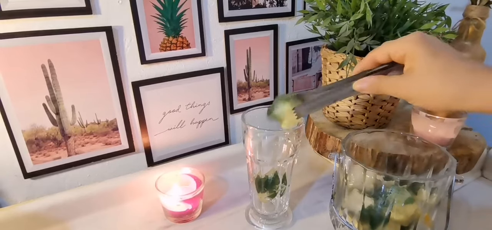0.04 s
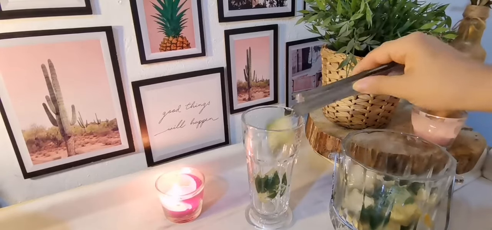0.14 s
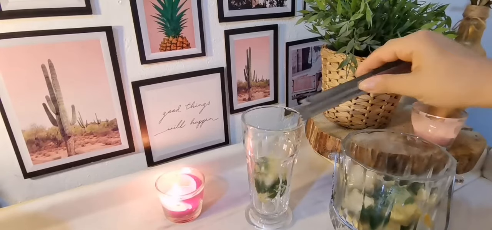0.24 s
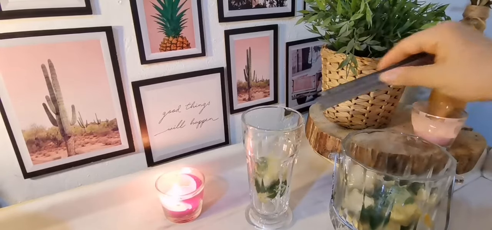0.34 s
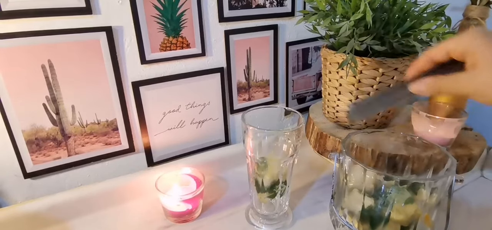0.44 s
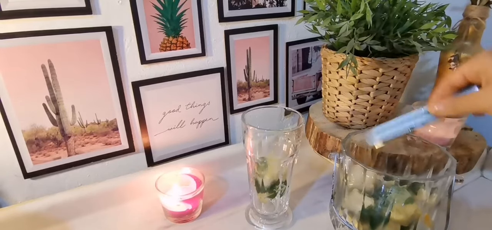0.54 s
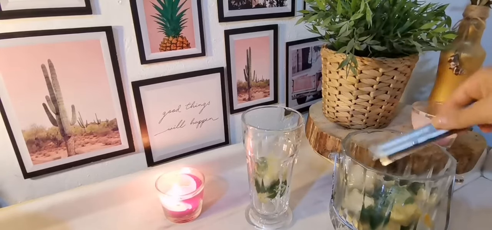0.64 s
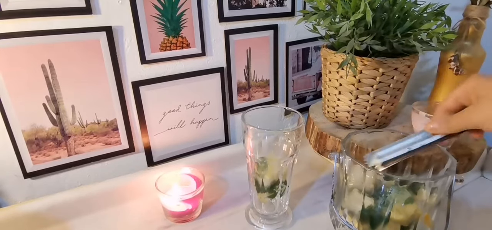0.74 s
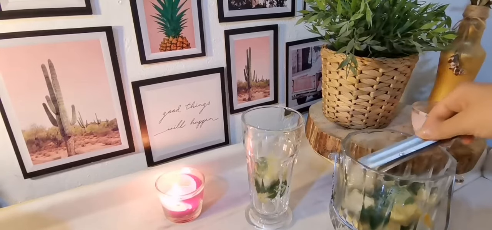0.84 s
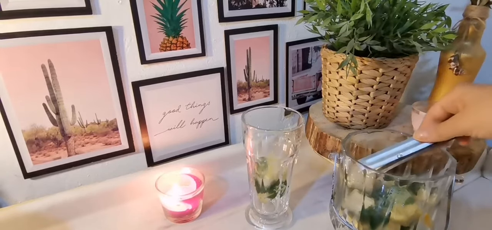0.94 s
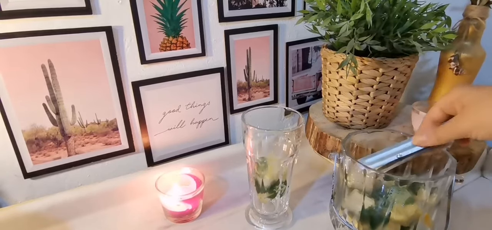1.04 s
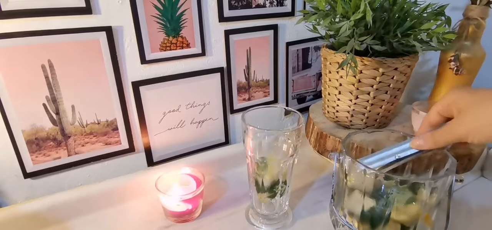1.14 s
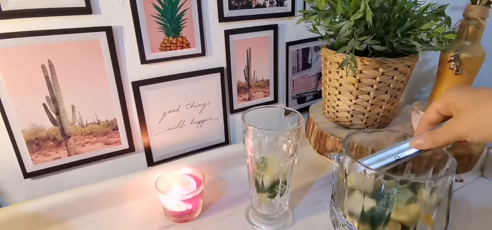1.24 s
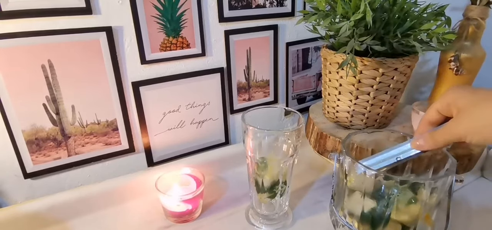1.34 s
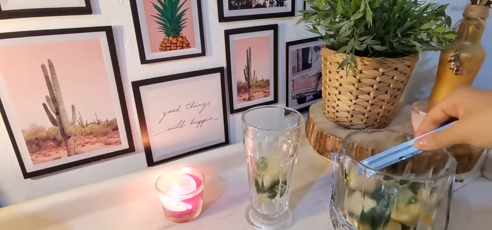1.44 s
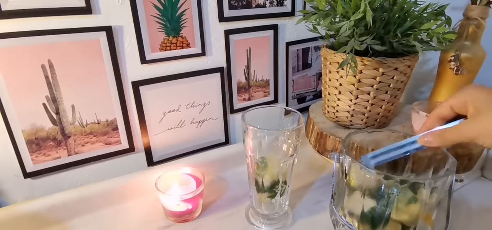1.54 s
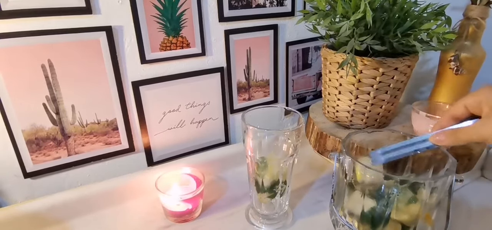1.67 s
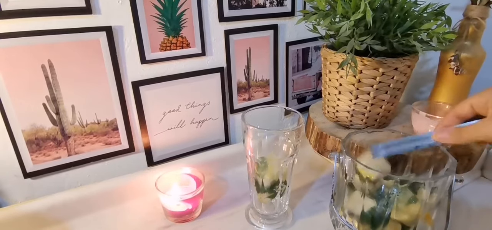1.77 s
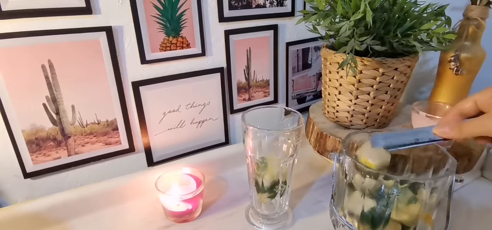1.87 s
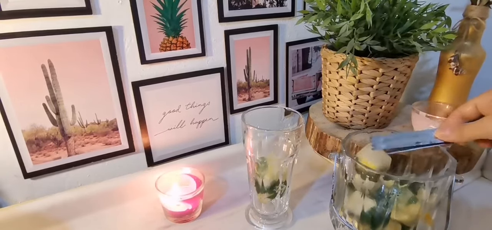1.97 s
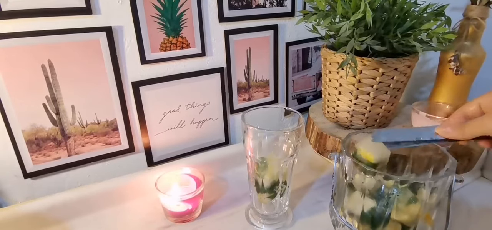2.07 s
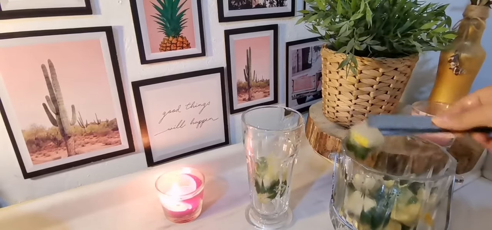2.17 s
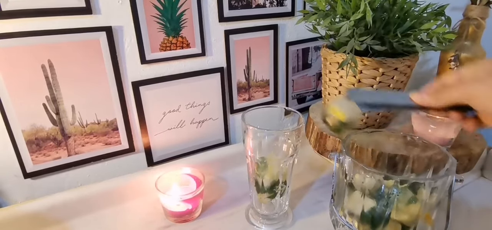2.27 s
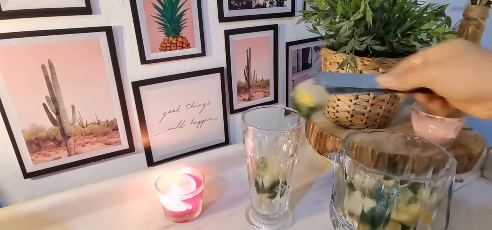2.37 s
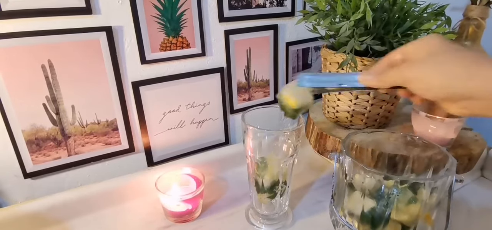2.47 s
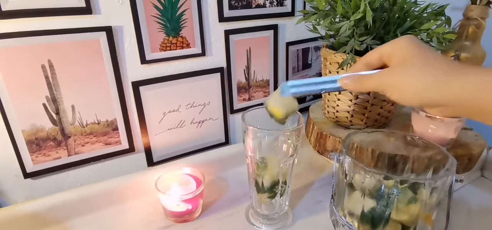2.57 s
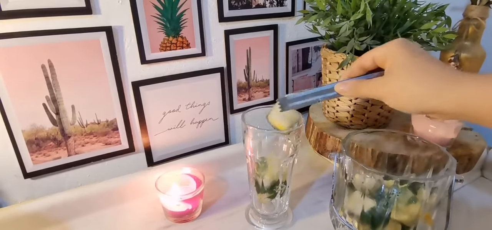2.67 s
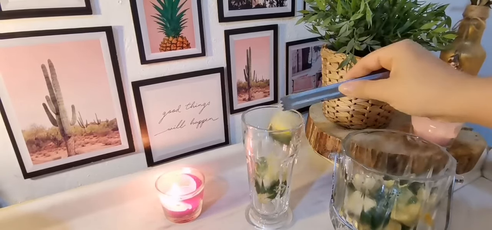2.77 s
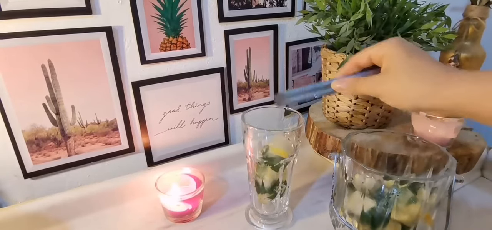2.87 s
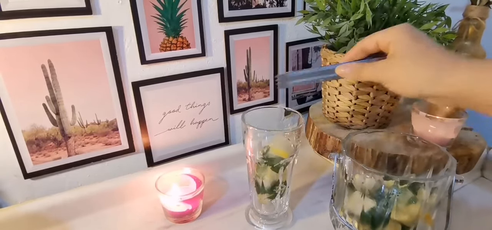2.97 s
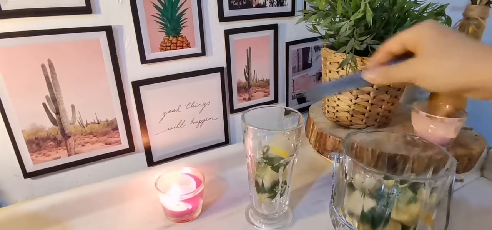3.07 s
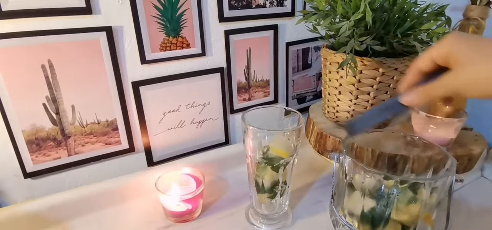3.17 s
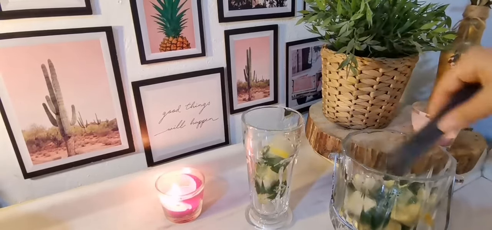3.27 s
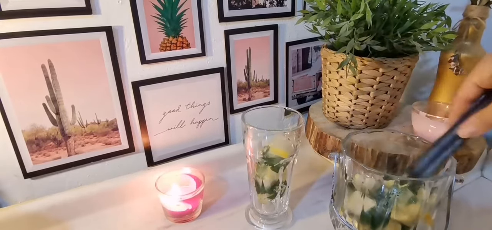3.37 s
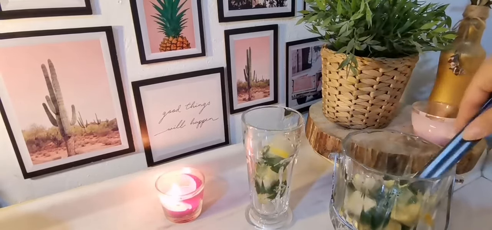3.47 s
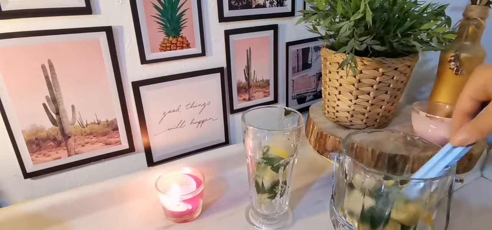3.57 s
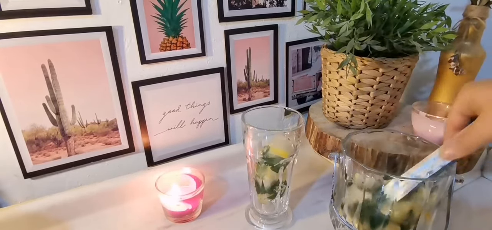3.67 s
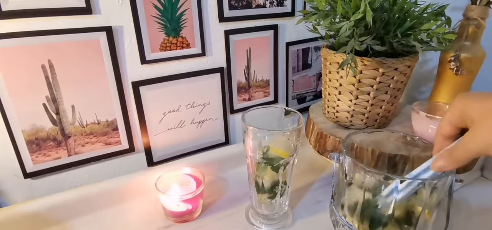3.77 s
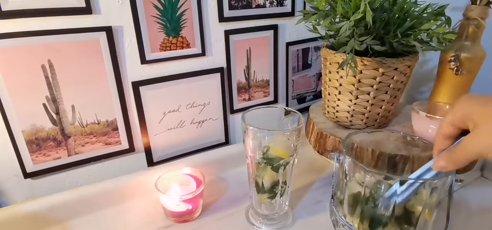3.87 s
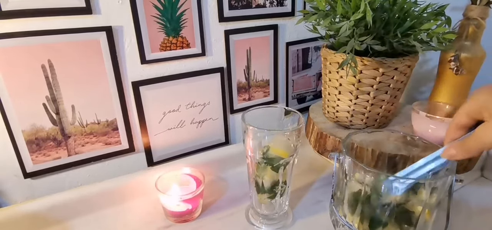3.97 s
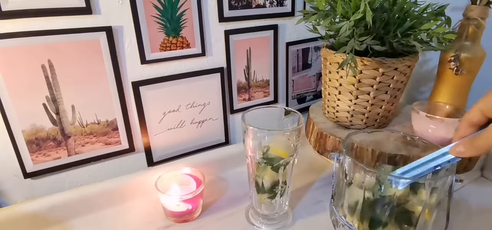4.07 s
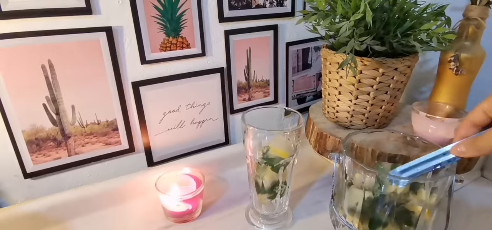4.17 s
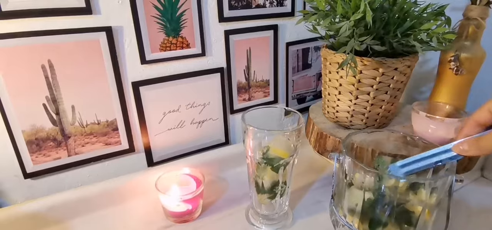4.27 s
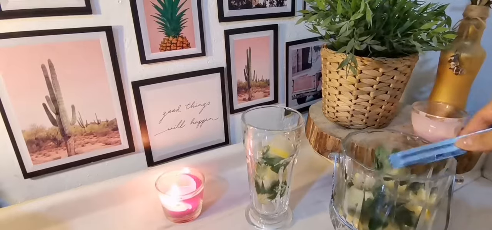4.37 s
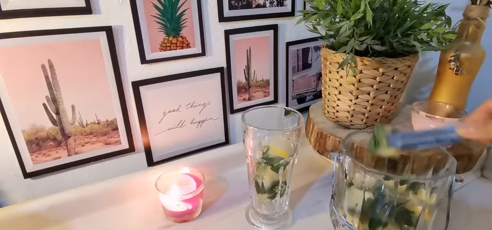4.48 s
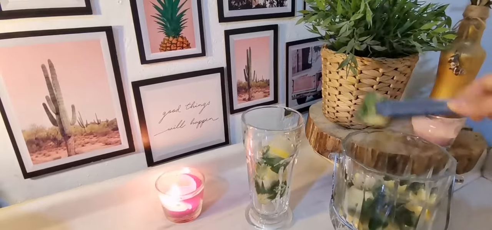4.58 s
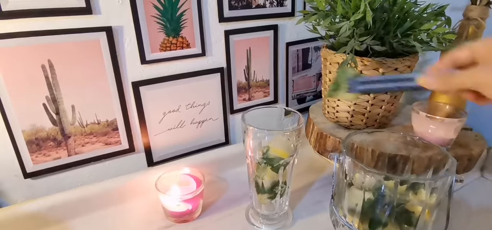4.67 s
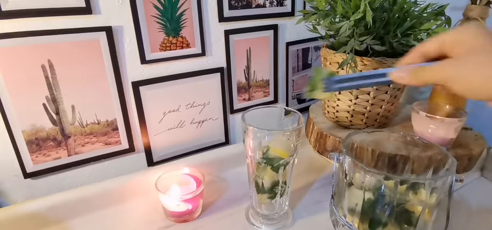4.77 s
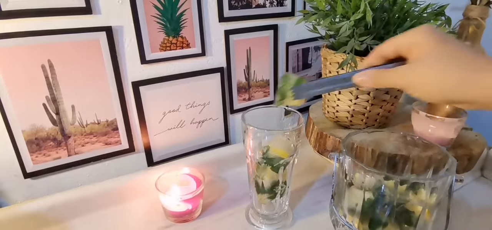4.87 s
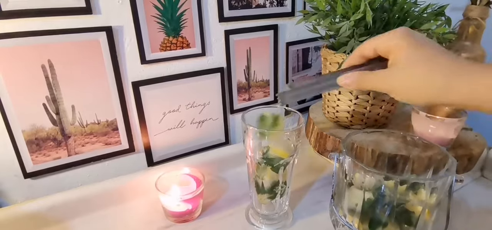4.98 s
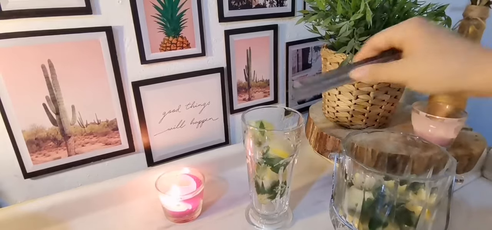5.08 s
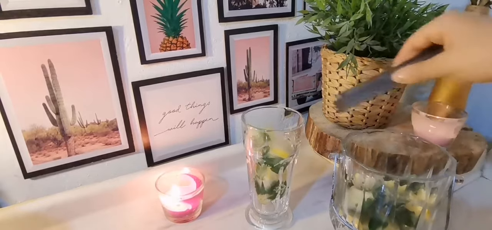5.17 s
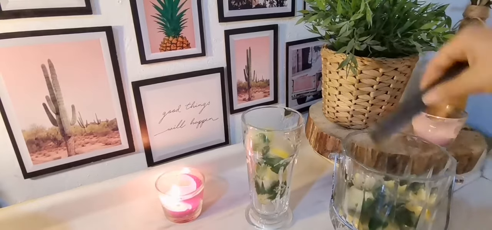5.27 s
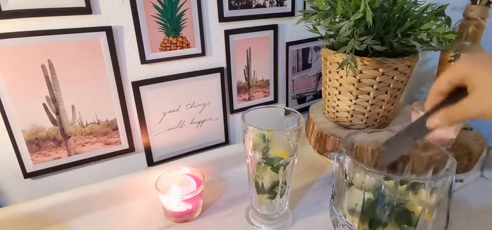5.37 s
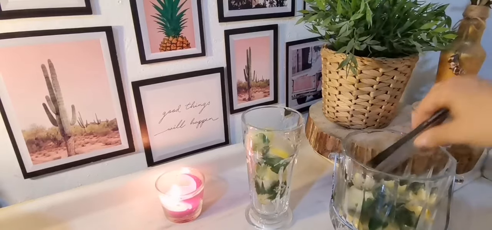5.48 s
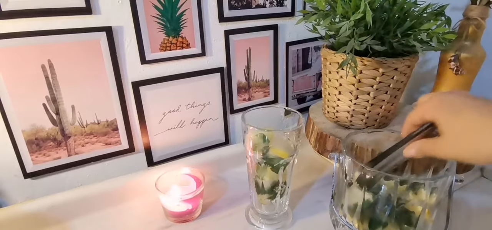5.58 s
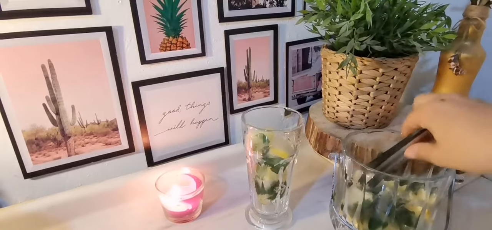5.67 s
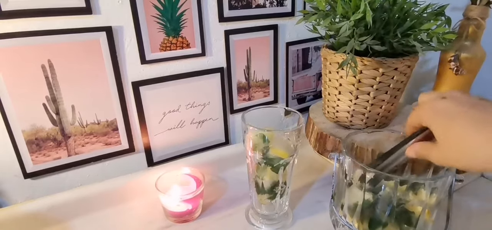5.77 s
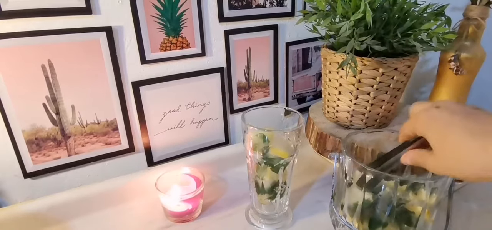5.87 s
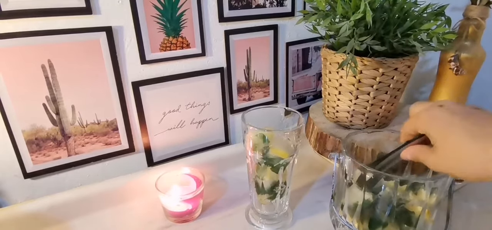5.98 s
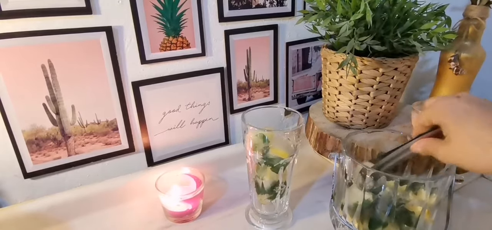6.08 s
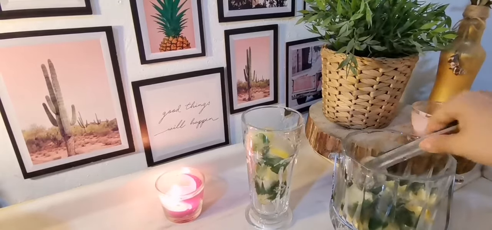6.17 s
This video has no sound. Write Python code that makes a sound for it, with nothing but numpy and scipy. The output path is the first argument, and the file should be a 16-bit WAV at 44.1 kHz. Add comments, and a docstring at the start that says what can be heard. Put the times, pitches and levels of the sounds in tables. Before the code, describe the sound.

Steel tongs rattle on the rim of a drinking glass with a few bright, short clinks as a piece of fruit drops in. Faint squishes follow as they dig through wet fruit and mint in a glass pitcher. The rattle comes twice more, with duller knocks on the pitcher and wet stirring between and after. It is heard close by in a small, quiet room with a low hum.

```python
"""Tongs, fruit and two glasses

Steel tongs move fruit and mint from a glass pitcher to a tumbler on a table in a small, quiet room.
They push wet fruit about, knock the pitcher's wall, and three times rattle on the tumbler's rim
as a piece drops in. Each touch rings the glass and damps the ring before it. A low hum lies beneath."""
import sys
import numpy as np
from scipy import signal
from scipy.fft import rfft, irfft, next_fast_len
from scipy.io import wavfile
from scipy.ndimage import uniform_filter1d

SR = 44100
rng = np.random.default_rng(int(sys.argv[2]) if len(sys.argv) > 2 else 0)


def waveform_to_disk(signal):
    """Save audio, clipped to [-1, 1], as 16-bit WAV at the path in sys.argv[1]."""
    frames = np.transpose(np.atleast_2d(signal))
    scaled = np.clip(frames, -1, 1) * 32767
    samples = np.round(scaled).astype(np.int16)
    wavfile.write(sys.argv[1], SR, samples)


N = 274743
T = np.arange(N) / SR

# room noise (frequency [Hz], density [dB])
AIR_SPECTRUM = [(41, -19), (70, -3.5), (108, 1.5), (124, -14.5), (190, -1.5), (268, -11.5), (412, -11),
                (566, -18.5), (620, -15), (1540, -24.5), (3410, -25), (6750, -30), (10200, -51),
                (16000, -32.5)]
# hum partials (frequency [Hz], level [dB])
HUM_PARTIALS = [(48.7, -52.5), (42.8, -64.5), (31.2, -69), (100.4, -69), (129.3, -64.5), (202.3, -68.5),
                (3410, -76.5)]

# glass modes with the tongs against it, four leading ones first (frequency [Hz], level [dB], T60 [s])
TUMBLER_MODES = [(696.3, -6, 0.15), (2608.5, -4, 0.35), (5894, -1, 0.18), (10465, 5, 0.15), (534, -5, 0.17),
                 (787, -1, 0.033), (876, -20, 0.28), (1090, -4, 0.059), (2592, -2, 0.38), (5946, 5, 0.047),
                 (6450, -17, 0.099), (8950, 4, 0.091), (10500, -8, 0.064), (11550, 2.5, 0.16),
                 (13500, 2.5, 0.12), (14000, -1, 0.12), (15400, -6.5, .07)]
PITCHER_MODES = [(1462, -38, .1), (3490, -5, 0.096), (5770, 9, 0.029), (7010, -8, 0.21), (1410, -16, .06),
                 (2117, -7, 0.1), (3280, -23, 0.06), (3566, -1.5, 0.045), (5810, -6.5, 0.077),
                 (8600, 6, 0.024), (9070, 4, 0.07), (10990, -32, 0.097), (13400, -10, 0.1),
                 (14830, -20, .07)]
# steel on tumbler rim and pitcher wall (time [s], ring [dB], brightness [dB], clack [dB])
TUMBLER_CLINKS = [(0.150, -20, -4, -31), (0.169, -38, 12, -55), (0.246, -41, 19.5, -20.5),
                  (0.266, -20, -4, -27.5), (0.2845, -20.5, -2.5, -20.5), (2.739, -45.5, 9, -59),
                  (2.866, -32.5, 6, -53), (2.911, -42, -1, -15), (2.9135, -12.5, -10, -24.5),
                  (2.942, -19, -7.5, -25), (5.018, -16, 1.5, -16.5), (5.039, -16.5, -17, -48),
                  (5.068, -13.5, -7, -24.5), (5.086, -38, 18.5, -27)]
PITCHER_CLINKS = [(3.545, -20, 1.5, -38.5), (3.625, -32, 0.5, -42), (3.815, -34, -16.5, -40.5),
                  (3.848, -44, -20, -28), (3.885, -26.5, -2.5, -35), (4.106, -38.5, 0, -39),
                  (4.155, -23.5, -22, -25), (4.353, -28.5, -13, -29)]
# clink split (low re ring [dB], top re ring [dB], brightness share of top [ratio], thud re clack [dB])
TUMBLER_SHARES = (-11, -28, 1.13, -17)
PITCHER_SHARES = (-6.5, -7.5, 0.33, -17)
# pieces land in the tumbler; tongs nudge the pitcher through fruit (time [s], ring [dB], thud [dB])
TUMBLER_LANDINGS = [(0.151, -17.5, -39.5), (0.247, -19.5, -25.5), (0.270, -41, -29.5), (2.740, -33.5, -54),
                    (2.915, -26.5, -47), (5.027, -19, -49), (5.285, -45.5, -50.5)]
PITCHER_NUDGES = [(0.894, -39.5, -66), (0.95, -46.5, -58), (3.822, -28.5, -38.5), (5.595, -26.5, -70),
                  (5.656, -32.5, -50), (5.752, -35, -43), (5.901, -33.5, -57), (5.938, -35, -57),
                  (6.051, -43.5, -55), (6.072, -36.5, -50), (6.157, -38.5, -41.5)]
# dead sounds of a contact (frequency [Hz], density [dB])
TUMBLER_CLACK_SPECTRUM = [(300, -27), (700, -8), (1300, 0.5), (1600, -7.5), (2000, -4), (3050, 2),
                          (3900, -10.5), (5200, -8.5), (6200, -42), (7500, -28.5), (12000, -57),
                          (15500, -25)]
PITCHER_CLACK_SPECTRUM = [(300, -18.5), (800, -3), (1700, 1), (2200, 15), (3300, 11.5), (4600, 4.5),
                          (7000, 0), (10500, -41.5), (15500, -49)]
THUD_SPECTRUM = [(60, -23), (120, 0.5), (200, -14), (310, 6.5), (405, 8), (465, -5), (540, -2), (900, -6),
                 (2000, -61)]
PLOP_SPECTRUM = [(250, -22), (500, -5.5), (750, 3.5), (1150, 0), (1500, -20), (3000, -23)]

# jaws slide; jaws dig into fruit (time [s], level [dB], half length [s])
SLIDES = [(0.161, -42, 0.015), (0.25, -47, 0.0046), (0.87, -58.5, .025), (2.792, -41.5, .008),
          (2.828, -37, 0.0082), (2.89, -48.5, .012), (4.978, -42.5, .003), (4.991, -41.5, .005)]
SQUISHES = [(0.897, -47, 0.007), (1.566, -41, 0.015), (1.861, -39, 0.0026), (1.878, -37, 0.0033),
            (1.92, -59.5, 0.055), (3.255, -61.5, 0.0093), (3.63, -43, 0.066), (3.803, -38.5, 0.015),
            (5.771, -32.5, 0.0066), (5.932, -39, 0.012)]
# tongs push fruit about (time [s], level [dB], half length [s], wetness [dB])
PUSHES = [(0.839, -53, 0.025, -19), (0.924, -49.5, 0.042, -2.5), (1.171, -56, 0.045, 3.5),
          (1.358, -64, 0.096, -3), (1.557, -49.5, 0.029, -7), (3.679, -41, 0.062, -0.5),
          (3.804, -35, 0.021, -6.5), (3.871, -42, 0.025, -5), (4.022, -59, 0.043, 0),
          (4.142, -51, 0.034, -13), (4.377, -54.5, 0.043, -17), (5.664, -41, 0.044, -2.5),
          (5.766, -43, 0.036, -0.5), (5.925, -42, 0.037, -4), (6.085, -54, 0.052, -16),
          (6.146, -53, 0.034, -8)]
# sliding steel, bumping fruit, rustling leaves (frequency [Hz], density [dB])
SLIDE_SPECTRUM = [(3000, -13.5), (7000, -0.5), (8700, -9.5), (9200, 17), (9700, -12), (12000, -4),
                  (13400, 4.5), (16000, -3)]
BUMP_SPECTRUM = [(100, -1.5), (200, 1.5), (330, 11), (470, 6.5), (750, 4.5), (1100, 2), (1450, 10.5),
                 (1700, -11), (3000, -36)]
RUSTLE_SPECTRUM = [(1000, -9), (2100, -1), (2800, -1.5), (3500, -1.5), (4600, -4), (6500, -10.5),
                   (10500, -19), (15000, -8.5)]
# bright noise of juice, squishes and steel ticks (frequency [Hz], density [dB])
BRIGHT_SPECTRUM = [(900, -27), (2200, -7), (4200, 2.5), (6300, 10.5), (8000, -1), (9200, 7), (11000, -8),
                   (13000, 6.5), (15500, 3.5)]

# room decay (frequency [Hz], T60 [s])
ROOM_T60 = [(120, 0.23), (300, 0.28), (800, 0.34), (2600, 0.32), (6000, 0.27), (15000, 0.2)]
# right channel tone, weaker in the top treble (frequency [Hz], gain [dB])
RIGHT_SHADE = [(200, -1.5), (900, -0.5), (2600, 3), (5500, -2), (9000, -6.5), (15000, -7)]


def from_db(db):
    """Decibels to gain."""
    return 10 ** (np.asarray(db) / 20)


def unit_rms(x):
    """Scale to unit power."""
    return x / np.sqrt(np.mean(x ** 2) + 1e-20)


def colour(x, spectrum):
    """Filter by a dB curve, interpolated in log frequency."""
    size = next_fast_len(N)
    hz = np.fft.rfftfreq(size, 1 / SR)
    knot_hz, knot_db = np.transpose(spectrum)
    gain = from_db(np.interp(np.log(hz + 1), np.log(knot_hz), knot_db))
    return irfft(rfft(x, size) * gain, size)[..., :N]


def drift(rate_hz):
    """Slow random wander."""
    knots = rng.standard_normal(2000)
    return np.interp(T * rate_hz, np.arange(len(knots)), knots)


def ring(x, hz, t60_s):
    """One mode: a unit click starts a decaying unit sine."""
    radius, angle = from_db(-60 / (t60_s * SR)), 2 * np.pi * hz / SR
    return signal.lfilter([0, np.sin(angle)], [1, -2 * radius * np.cos(angle), radius * radius], x)


def envelope(times_s, db, fade_s, rise_s):
    """Jump at each contact, then fade; overlaps add in power."""
    impulses = 1e-18 + np.bincount(np.round(times_s * SR).astype(int), from_db(2 * db), N)
    power = signal.lfilter([1], [1, -np.exp(-2 / (fade_s * SR))], impulses)
    pole = np.exp(-1 / (rise_s * SR))
    return signal.lfilter([1 - pole], [1, -pole], np.sqrt(power))


def burst(times_s, db, spectrum, fade_s, rise_s):
    """Many heavily damped modes: a puff of coloured noise per contact."""
    return envelope(times_s, db, fade_s, rise_s) * unit_rms(colour(rng.standard_normal(N), spectrum))


def strokes(rows, spectrum, grains_per_s, spread_db):
    """Short swells of uneven friction grains, quicker to come than to go."""
    swell = sum(from_db(db) * np.exp(-.5 * ((T - at_s) / (half_s * np.where(T < at_s, .7, 1))) ** 2)
                for at_s, db, half_s in rows)
    sizes = from_db(spread_db * np.minimum(rng.exponential(1, N), 4))
    grains = sizes * rng.choice([-1, 1], N) * (rng.random(N) < grains_per_s / SR)
    return swell * unit_rms(colour(grains, spectrum))


def background(air_db, waver_db):
    """Soft room noise, mostly shared by both sides in the bass, and a wavering hum."""
    mid = colour(rng.standard_normal(N), AIR_SPECTRUM)
    side = colour(rng.standard_normal(N), AIR_SPECTRUM)
    side = colour(side, [(50, -4.5), (250, -8.5), (800, -0.5), (4000, 0)])
    air = unit_rms(np.array([mid + side, mid - side]))
    hum = 0
    for hz, db in HUM_PARTIALS:
        peak = np.sqrt(2) * from_db(db + waver_db * drift(3.1))
        hum += peak * np.sin(2 * np.pi * hz * T + 0.2 * drift(14))
    return from_db(air_db) * air + hum


def contacts(clinks, shares, soft_hits, cushion_db=-27.5, soft_clack_db=-19):
    """Split each touch into (time [s], low, middle, high, top modes [dB], clack [dB], thud [dB])."""
    low_db, top_db, top_share, thud_db = shares
    hard = [(at_s, db + low_db, db, db + bright, db + top_db + top_share * bright, clack, clack + thud_db)
            for at_s, db, bright, clack in clinks]
    # soft contacts barely reach the upper modes
    soft = [(at_s, db, *[db + cushion_db] * 3, db + soft_clack_db, thud) for at_s, db, thud in soft_hits]
    return np.array(hard + soft)


def choked(strike, times_s, db, choke_db):
    """One ring per touch; each later touch damps it, from just before its own strike."""
    touch_count = np.searchsorted(np.sort(times_s), T + .004).astype(float)
    loss_db = uniform_filter1d(choke_db * touch_count, size=SR // 200)
    out = np.zeros(N)
    for start, level_db in zip(np.round(times_s * SR).astype(int), db):
        lost_db = loss_db[start:start + len(strike)] - loss_db[start]
        out[start:start + len(lost_db)] += strike[:len(lost_db)] * from_db(level_db - lost_db)
    return out


def struck_glass(hits, modes, ring_db, buzz_db, buzz_s, build_s, lag_cycles, choke_db):
    """The wall rings after each touch and buzzes while steel chatters on it; stereo."""
    times_s, *blows_db = hits.T[:5]
    leading_hz = np.array(modes)[:4, 0]
    grit = rng.standard_normal(N)
    tap = signal.unit_impulse(SR) + 1e-18
    out = np.zeros((2, N))
    for k, (blow_db, lead_hz) in enumerate(zip(blows_db, leading_hz)):
        # each mode takes the blow of its nearest leading mode
        family = [mode for mode in modes if np.argmin(np.abs(np.log(mode[0] / leading_hz))) == k]
        strike = sum(from_db(db) * (ring(tap, hz, t60_s) - ring(tap, hz, build_s))
                     for hz, db, t60_s in family)
        wave = choked(strike, times_s, blow_db + ring_db, choke_db)
        buzz_t60_s = 31 / lead_hz
        buzz = ring(ring(grit, lead_hz, buzz_t60_s), lead_hz, buzz_t60_s)
        wave += envelope(times_s, blow_db + buzz_db, buzz_s, rise_s=0.00021) * unit_rms(buzz)
        # a bending mode's lobes reach the two sides part of a cycle apart
        out += [wave, np.interp(T - lag_cycles / lead_hz, T, wave)]
    return out


def knocks(hits, clack_spectrum, clack_db, clack_s, thud_db):
    """Each touch clacks the tongs and thuds through the glass into the table."""
    times_s, clacks_db, thuds_db = hits.T[[0, 5, 6]]
    clack = burst(times_s, clacks_db + clack_db, clack_spectrum, clack_s, rise_s=0.00023)
    thud = burst(times_s, thuds_db + thud_db, THUD_SPECTRUM, fade_s=0.029, rise_s=0.0008)
    return clack + thud


def plops(soft_hits, gain_db, fade_s):
    """Wet flesh slaps dully at each soft contact, in step with its ring level."""
    times_s, ring_db, _ = np.transpose(soft_hits)
    return burst(times_s, ring_db + gain_db, PLOP_SPECTRUM, fade_s, rise_s=0.001)


def sliding_jaws():
    """Steel jaws slide and sing thinly."""
    return strokes(SLIDES, SLIDE_SPECTRUM, grains_per_s=16000, spread_db=7.0)


def stirring():
    """Each push bumps fruit against the pitcher; wet leaves rustle and juice squelches."""
    pushes = [(at_s, db, half_s) for at_s, db, half_s, _ in PUSHES]
    wet_pushes = [(at_s, db + wet_db, half_s) for at_s, db, half_s, wet_db in PUSHES]
    bumps = strokes(pushes, BUMP_SPECTRUM, grains_per_s=450, spread_db=3.0)
    leaves = strokes(wet_pushes, RUSTLE_SPECTRUM, grains_per_s=830, spread_db=4.0)
    juice = strokes(wet_pushes, BRIGHT_SPECTRUM, grains_per_s=1800, spread_db=4.0)
    return from_db(1.0) * (bumps + leaves) + from_db(-8) * juice


def squishes():
    """Fruit squishes as the jaws dig in and grip."""
    return strokes(SQUISHES, BRIGHT_SPECTRUM, grains_per_s=8900, spread_db=-2.0)


def steel_ticks(hits, gain_db):
    """Steel ticks sharply on the pitcher at each touch, in step with the high modes."""
    times_s, high_db = hits.T[[0, 3]]
    return burst(times_s, high_db + gain_db, BRIGHT_SPECTRUM, fade_s=0.004, rise_s=0.0003)


def early_reflections(x, level_db, fade_s, right_lag_s):
    """Direct sound plus quick echoes off table and wall; the sides differ above the bass."""
    t = T[:SR // 16]
    mid, side = rng.standard_normal((2, len(t))) * np.exp(-t / fade_s) * (t > .0008)
    side = signal.sosfilt(signal.butter(1, 500, "high", fs=SR, output="sos"), side)
    response = from_db(level_db) * unit_rms(np.array([mid + side, mid - side])) / np.sqrt(len(t))
    direct = np.array([x, np.interp(T - right_lag_s, T, x)])
    return direct + signal.fftconvolve(x[None], response, axes=1)[:, :N]


def room(x, tail_db):
    """Add a diffuse stereo tail that dies band by band."""
    t = T[:SR * 3 // 4]
    white = rfft(rng.standard_normal((2, len(t))))
    hz = np.fft.rfftfreq(len(t), 1 / SR)
    white[1] = np.where(hz < 330, white[0], white[1])   # long waves reach both sides alike
    band_hz, t60s_s = np.transpose(ROOM_T60)
    tail = 0
    for share, t60_s in zip(np.eye(len(t60s_s)), t60s_s):
        band = irfft(white * np.interp(hz, band_hz, share), len(t))
        tail += band * from_db(-60 * t / t60_s)
    onset = np.clip(t / 0.0028, 0, 1)
    response = from_db(tail_db) * unit_rms(tail * onset) / np.sqrt(len(t))
    return x + signal.fftconvolve(x, response, axes=1)[:, :N]


def scene():
    """Glass, fruit and tongs in the room; stereo."""
    tumbler_hits = contacts(TUMBLER_CLINKS, TUMBLER_SHARES, TUMBLER_LANDINGS)
    pitcher_hits = contacts(PITCHER_CLINKS, PITCHER_SHARES, PITCHER_NUDGES)
    tumbler = struck_glass(tumbler_hits, TUMBLER_MODES, ring_db=-3.5, buzz_db=-11.0, buzz_s=0.033,
                           build_s=0.0062, lag_cycles=0.24, choke_db=6.5)
    pitcher = struck_glass(pitcher_hits, PITCHER_MODES, ring_db=-4.0, buzz_db=4.0, buzz_s=0.0055,
                           build_s=0.0017, lag_cycles=0.25, choke_db=16.0)
    glass = tumbler + pitcher * from_db([[0.5], [-0.5]])   # pitcher slightly left
    handling = knocks(tumbler_hits, TUMBLER_CLACK_SPECTRUM, clack_db=5.0, clack_s=0.0038, thud_db=1.5)
    handling += knocks(pitcher_hits, PITCHER_CLACK_SPECTRUM, clack_db=5.5, clack_s=0.0016, thud_db=1.0)
    handling += steel_ticks(pitcher_hits, gain_db=-5)
    handling += plops(TUMBLER_LANDINGS, gain_db=-11, fade_s=0.025)
    handling += plops(PITCHER_NUDGES, gain_db=-13.5, fade_s=0.014)
    handling += stirring() + squishes() + sliding_jaws()
    handling = early_reflections(handling, level_db=0.5, fade_s=0.0042, right_lag_s=0.00011)
    left, right = room(glass, tail_db=-2.5) + room(handling, tail_db=-7.0)
    return np.array([left, colour(right, RIGHT_SHADE)]) + background(air_db=-54.35, waver_db=1.6)


def record(dry):
    """Steep low-pass at 16 kHz."""
    return signal.sosfilt(signal.ellip(10, .1, 80, 16000, fs=SR, output="sos"), dry)


dry = scene()
out = record(dry)
waveform_to_disk(out)
```